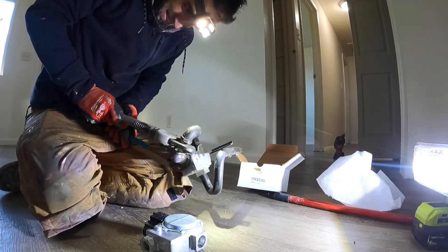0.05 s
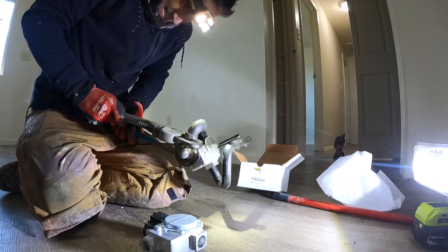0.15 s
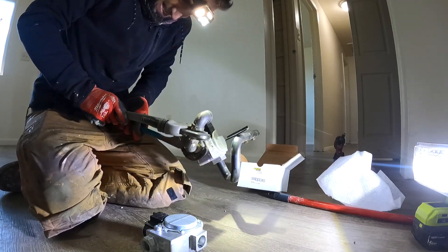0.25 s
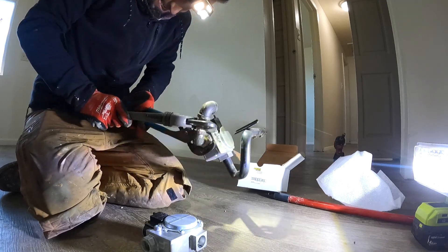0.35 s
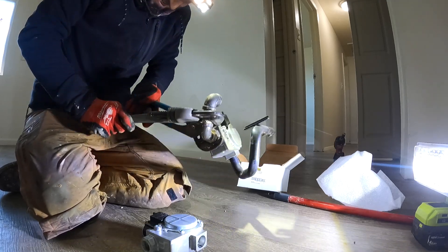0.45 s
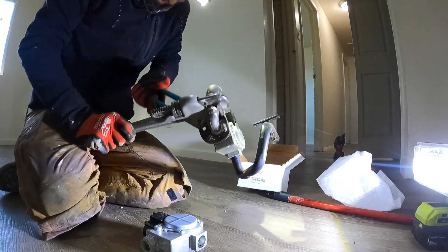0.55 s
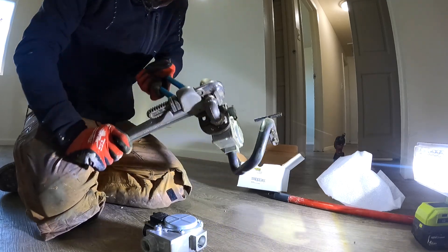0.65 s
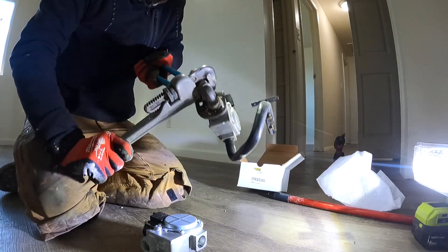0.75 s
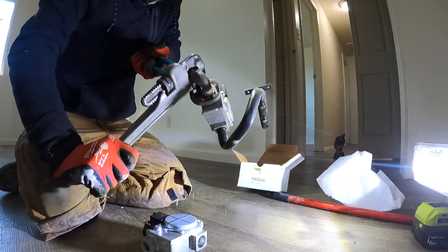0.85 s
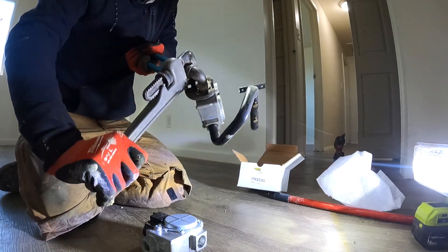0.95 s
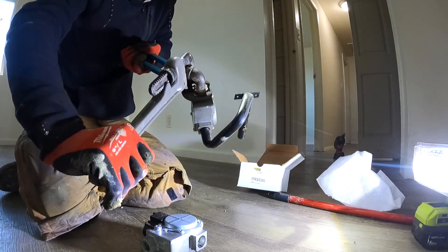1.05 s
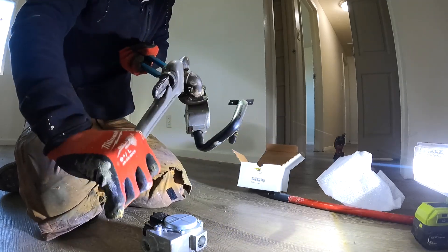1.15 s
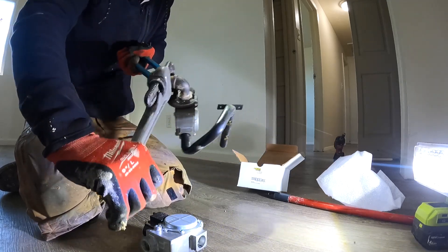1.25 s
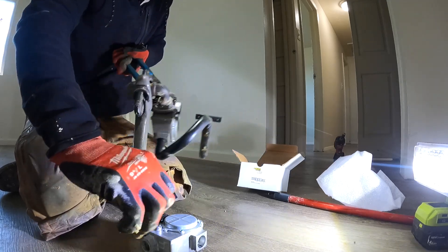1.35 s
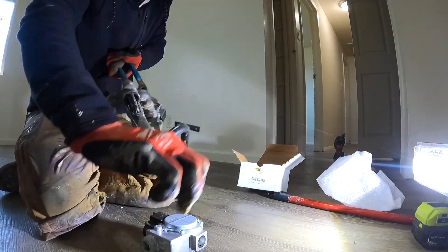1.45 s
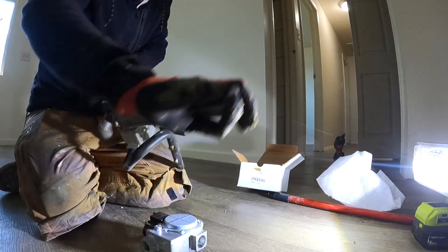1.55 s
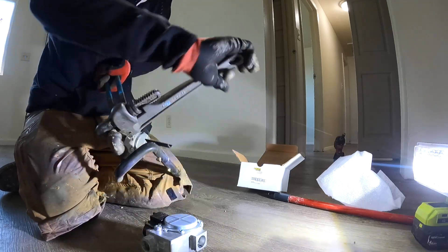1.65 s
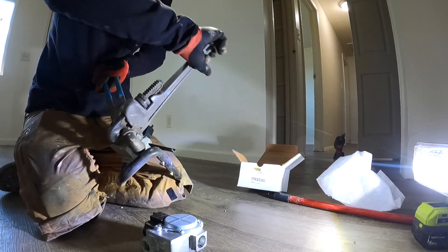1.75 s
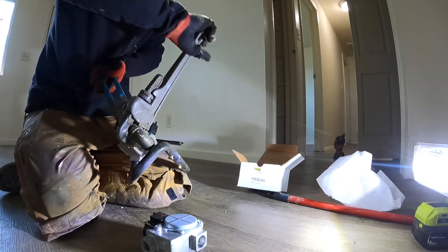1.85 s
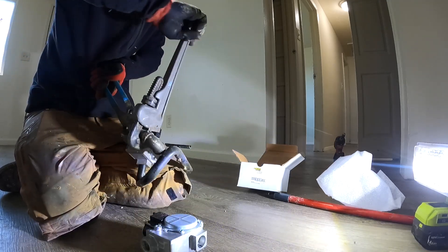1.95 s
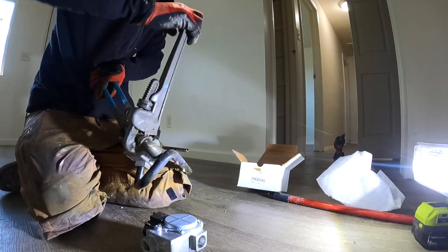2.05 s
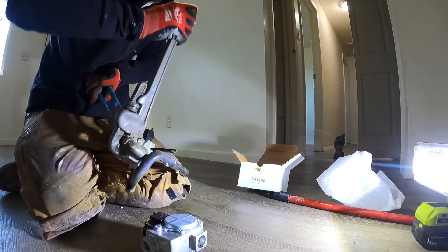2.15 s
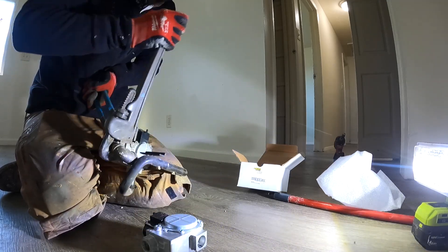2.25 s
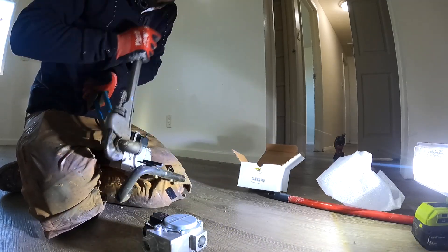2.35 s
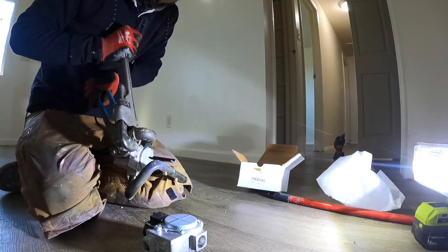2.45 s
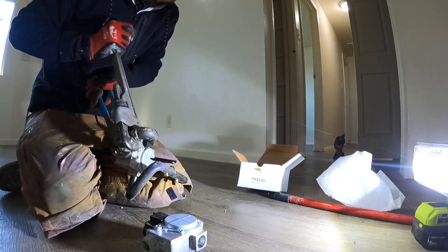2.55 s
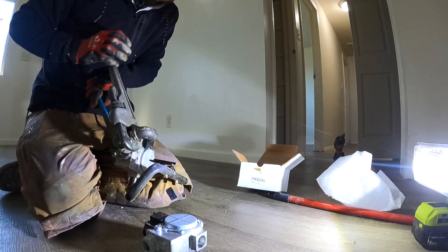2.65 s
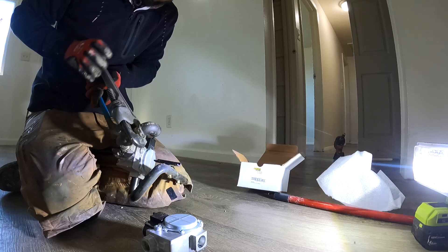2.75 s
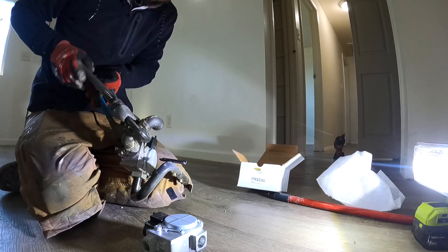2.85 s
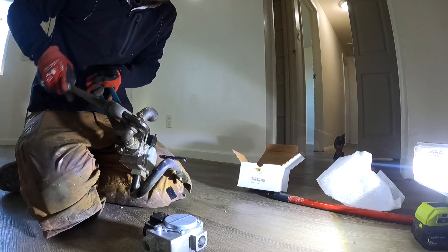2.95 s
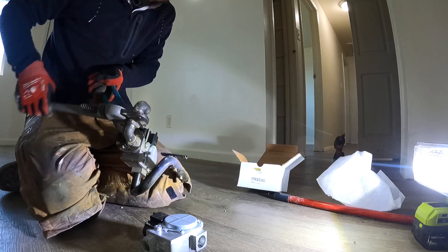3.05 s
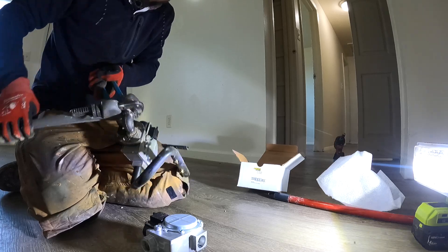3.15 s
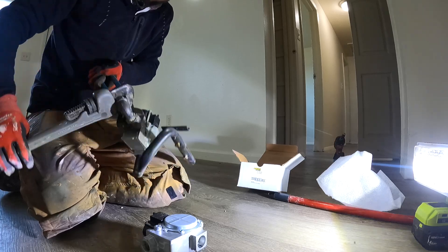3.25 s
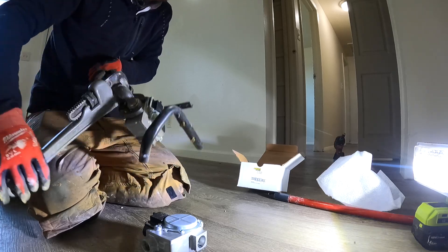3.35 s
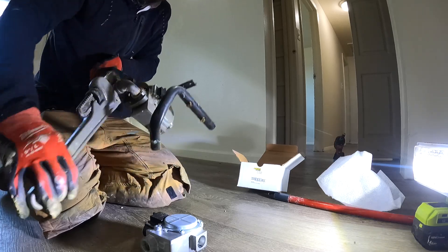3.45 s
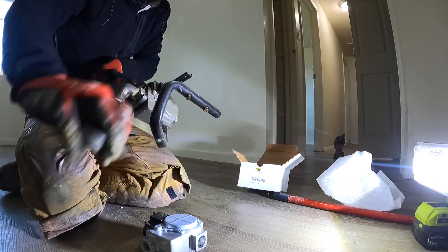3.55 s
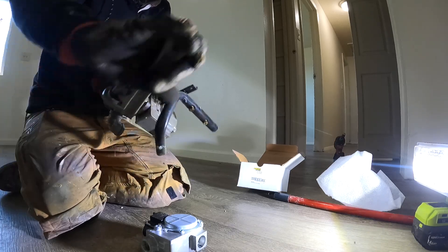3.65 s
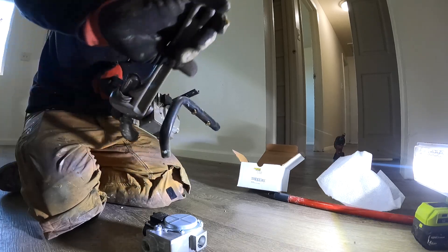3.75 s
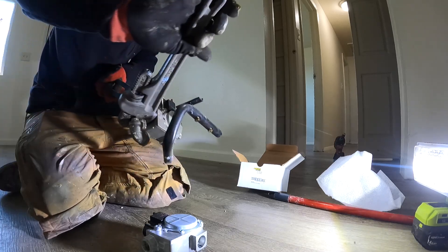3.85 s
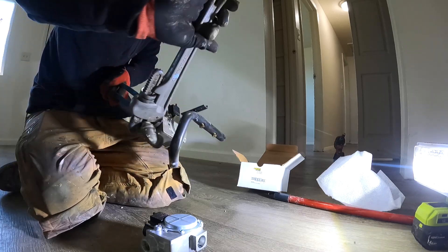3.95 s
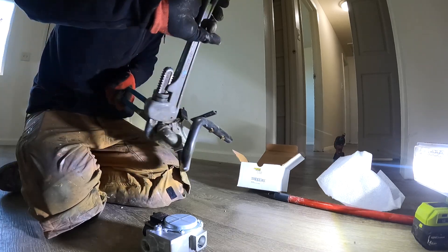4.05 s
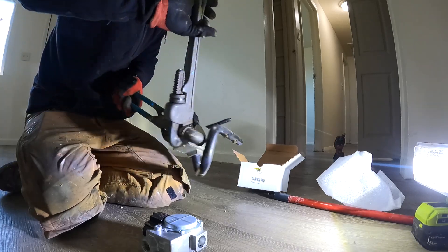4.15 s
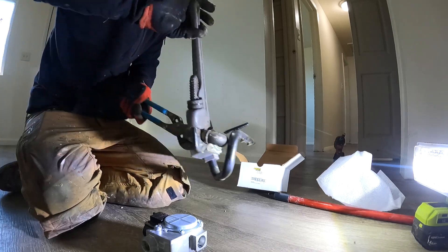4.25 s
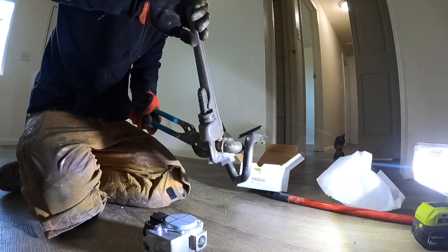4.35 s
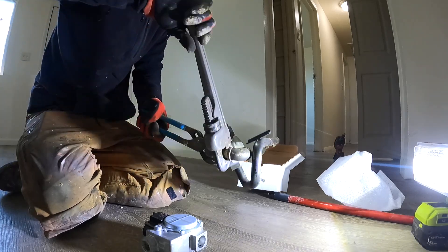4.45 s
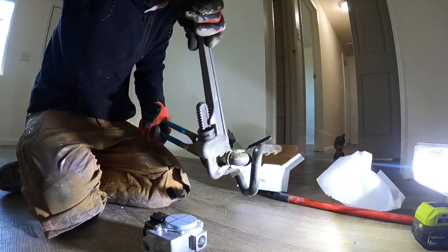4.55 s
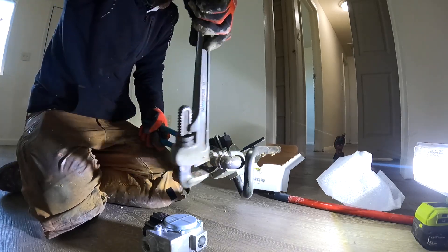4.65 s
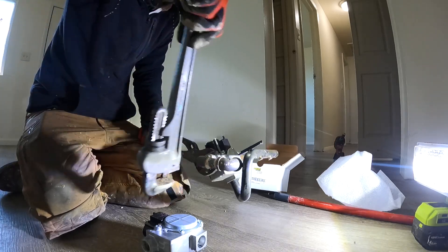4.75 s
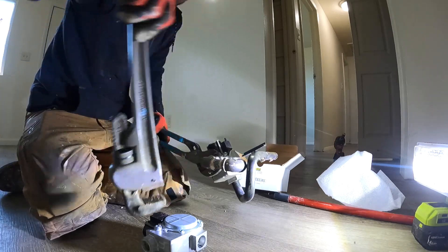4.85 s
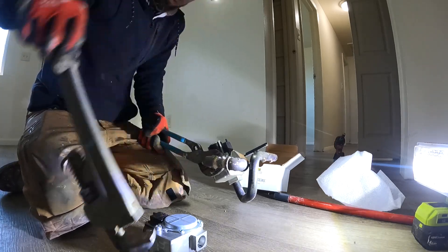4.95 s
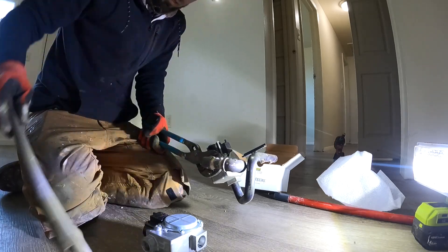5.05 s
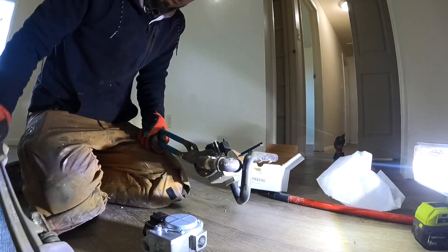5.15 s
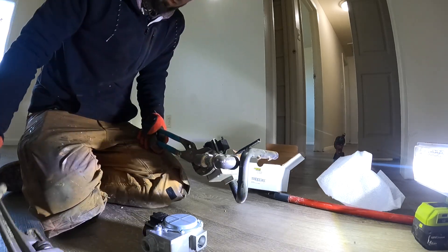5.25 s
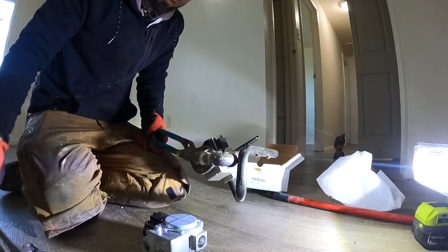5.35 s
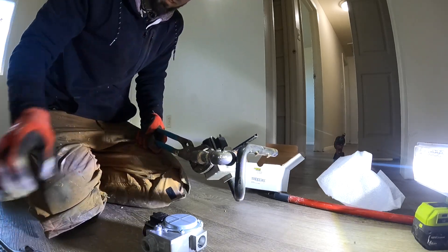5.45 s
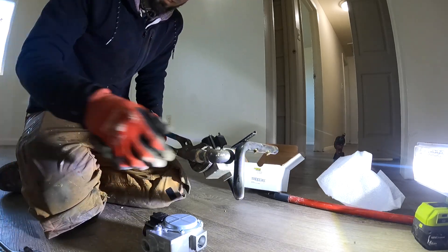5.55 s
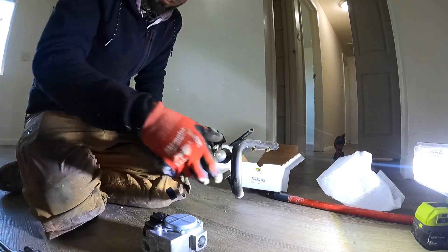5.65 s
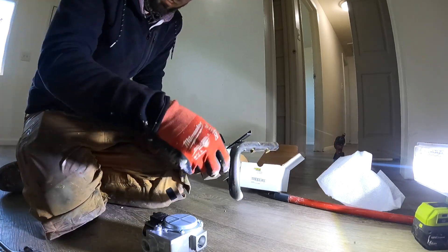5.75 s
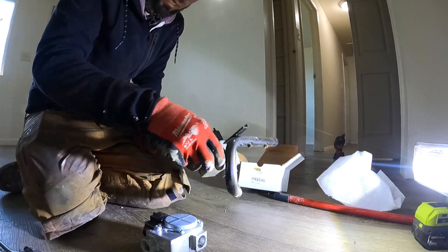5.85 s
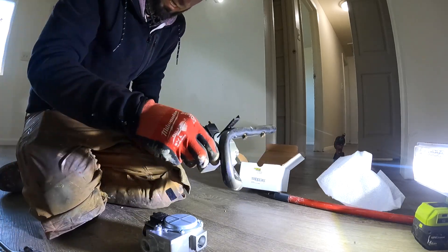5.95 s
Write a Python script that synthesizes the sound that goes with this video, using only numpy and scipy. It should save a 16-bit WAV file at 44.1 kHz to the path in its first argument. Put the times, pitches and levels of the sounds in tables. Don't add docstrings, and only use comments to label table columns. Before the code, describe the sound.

Close stereo microphone in an empty, reverberant room. Cloth rubs in short strokes between isolated damped steel knocks as a wrench works on fittings. A quick burst of sharper clacks follows, then a lull with a few small ticks. Finally the heavy tool lands on boards, by far the loudest event, tips over, chatters and scrapes, leaving ringing steel, room echo and faint hum.

```python
import sys
import numpy as np
from scipy import signal
from scipy.fft import rfft, irfft
from scipy.io import wavfile

SR = 44100
rng = np.random.default_rng(int(sys.argv[2]) if len(sys.argv) > 2 else 0)


def voltage_ratio(level):
    return 10 ** (np.asarray(level, float) / 20)


def wrap_up_sound(samples):
    columns = np.atleast_2d(samples).T
    tamed = np.clip(columns, -1, 1)
    steps = np.round(tamed * 32767).astype(np.int16)
    wavfile.write(sys.argv[1], SR, steps)


N = 265041


def rms_one(x):
    return x / np.sqrt(np.mean(x ** 2) + 1e-20)


def at_hz(points, hz, order=1):
    return np.interp(np.log(hz), np.log(np.array(points)[:, 0]), np.array(points)[:, order])


def drift(rate):
    r = np.exp(-80 * np.pi * rate / SR)
    slow = signal.lfilter([1], [1, -2 * r, r * r], rng.standard_normal(N // 40 + 2002))[2000:]
    return np.interp(np.arange(N) / 40, np.arange(len(slow)), rms_one(slow))


def ring(clicks, hz, t60):
    r, w = voltage_ratio(-60 / (t60 * SR)), 2 * np.pi * hz / SR
    return signal.lfilter([0, np.sin(w)], [1, -2 * r * np.cos(w), r * r], clicks + 1e-18)


def resonance(x, hz, width_hz):
    r = np.exp(-np.pi * width_hz / SR)
    feedback = [1, -2 * r * np.cos(2 * np.pi * hz / SR), r * r]
    return signal.lfilter([(1 - r * r) / 2, 0, (r * r - 1) / 2], feedback, x)


def bands(size):
    edges_hz = 22 * 2 ** np.arange(0, 9.7, .5)
    white = rng.standard_normal((2, 2, size))
    for k, (low, high) in enumerate(zip(edges_hz, edges_hz[1:])):
        band = signal.butter(2, [low, high], "band", fs=SR, output="sos")
        mid, side = signal.sosfilt(band, white[k % 2])
        yield np.sqrt(low * high), mid, side


def knock(hz, cycles, chatter_s, draws, spread_db):
    t = np.arange(len(draws)) / SR
    contact = draws ** 3 * voltage_ratio(-60 * t / chatter_s) * 0.078
    contact[0] = 1
    octaves = np.array([-1.6, -1.15, -.75, -.4, 0, .3, .55, .85]) * (1 + .08 * draws[-8:])
    t60 = cycles / hz * (chatter_s / 0.018) ** .5
    body = 0
    for k, octave in enumerate(octaves):
        mode_gain = voltage_ratio(-spread_db * abs(octave)) * (-1) ** k
        body = body + mode_gain * ring(contact, hz * 2 ** octave, t60 / 2 ** octave * 2 ** octave)
    return body / np.max(np.abs(body))


def jaws():
    # start in seconds, knock level in dB, knock pitch in Hz, jaw click level in dB.
    turning = [(0.488, -41, 2600, -50), (1.016, -16, 1530, -45), (1.018, -28.5, 870, -55),
               (1.022, -17.5, 1734, -32), (1.313, -30.5, 1770, -48), (1.364, -36, 1840, -70),
               (1.605, -44, 1740, -57), (1.796, -22.5, 1950, -34), (1.8, -32, 1030, -34),
               (1.813, -45, 1000, -39), (1.843, -29.5, 1100, -26.5), (1.926, -32, 1710, -63),
               (2.174, -42, 1190, -44.5), (2.357, -29, 2740, -56), (2.448, -26, 3200, -51),
               (2.73, -40.5, 1410, -50), (2.988, -42, 1240, -44), (3.251, -46, 2130, -40),
               (3.33, -38, 3170, -36.5), (3.351, -33, 3480, -36)]
    refitting = [(3.371, -21.5, 2820, -46), (3.377, -21, 1610, -45), (3.378, -40, 850, -41),
                 (3.448, -14.5, 2154, -27.5), (3.6, -15, 2720, -22), (3.61, -9.5, 2210, -26),
                 (3.669, -5.5, 2980, -15), (3.677, -11.5, 2990, -19.5), (3.707, -14.5, 2800, -44),
                 (3.74, -17, 2070, -23), (3.757, -21.5, 1360, -25), (3.771, -22, 2900, -49),
                 (3.917, -28, 2940, -45), (3.984, -31.5, 1490, -59), (3.995, -31, 2280, -42),
                 (4.705, -26.5, 2480, -44), (4.732, -30, 2480, -60), (4.88, -39, 1020, -47),
                 (4.916, -16.5, 2490, -31), (4.917, -28.5, 940, -35), (4.926, -37, 2270, -40),
                 (5.043, -33, 2280, -53), (5.13, -43, 1060, -75)]
    laying_down = [(5.253, -25.5, 890, -50), (5.2655, -5, 1110, -15), (5.273, 0, 1640, -0.5),
                   (5.479, -12, 985, -25), (5.491, -37, 910, -15.5), (5.512, -27, 1000, -20),
                   (5.526, -5.5, 3420, -17), (5.537, -10, 1050, -29), (5.549, -10, 1060, -24),
                   (5.5687, -12, 1490, -35), (5.576, -48, 1010, -11), (5.59, -15, 2540, -38),
                   (5.622, -13.5, 992, -16), (5.636, -22, 950, -18), (5.661, -15.5, 1170, -20),
                   (5.724, -26, 950, -40), (5.77, -18, 2260, -55)]
    out = np.zeros(N)
    for rows, chatter_s in (turning, 0.024), (refitting, 0.033), (laying_down, 0.027):
        for s, dull_db, dull_hz, click_db in rows:
            at, draws = round(s * SR), rng.standard_normal((2, 3000))
            click_hz = 4504 * (1 + .03 * draws[0, -9])
            out[at:at + 3000] += voltage_ratio(dull_db) * knock(dull_hz, 12.3, chatter_s, draws[0], spread_db=10.0)
            out[at:at + 3000] += voltage_ratio(click_db + 6.0) * knock(click_hz, 23.0, chatter_s, draws[1], spread_db=19.0)
    return out


def loose_parts():
    # start in seconds, level in dB, pitch in Hz, chatter in ms.
    ticks = [(1.018, -34, 2900, 30), (1.029, -32, 3270, 110), (1.015, -34.5, 6000, 36),
             (1.365, -46, 2850, 68), (1.253, -51.5, 9400, 5.5), (1.801, -37, 1000, 49),
             (1.843, -23, 5100, 4.1), (3.449, -26, 3780, 18), (3.061, -36.5, 5200, 4.4),
             (3.376, -30.5, 6000, 26), (3.611, -17, 2300, 43), (3.917, -43, 10300, 4.5),
             (4.39, -34.5, 10000, 27), (4.391, -32.5, 7000, 31), (4.392, -31, 4700, 21),
             (4.656, -50, 7000, 50), (4.706, -29.5, 2110, 81), (4.734, -30.5, 1937, 73),
             (4.734, -49, 840, 130), (4.917, -29.5, 5520, 20), (5.044, -54, 2970, 6),
             (5.275, -12, 3550, 30), (5.274, -15, 5600, 51), (5.274, -14.5, 10400, 20),
             (5.492, -11.5, 5300, 6.3), (5.519, -22, 5570, 35), (5.533, -16.5, 3700, 36),
             (5.266, -9, 1020, 38), (5.569, -7.5, 6970, 14.4), (5.661, -23, 7600, 8)]
    out = np.zeros(N)
    for s, db, hz, chatter_ms in ticks:
        at, draws = round(s * SR), rng.standard_normal(3000)
        out[at:at + 3000] += voltage_ratio(db + 5.0) * knock(hz, 15.0, max(chatter_ms, 1) / 1000, draws, spread_db=21.5)
    return out


def cracks():
    # start in seconds, level in dB, length of each half (push, pull) in ms.
    pulses = [
        (1.0225, -22, 0.35),
        (4.9165, -21.5, .2),
        (5.2655, -2.5, 0.29),
        (5.549, -11, 0.43),
        (5.5688, 0, .3),
    ]
    t = np.arange(N) / SR
    out = 0
    for s, db, ms in pulses:
        turn = np.clip((t - s) * 1000 / ms / 2, 0, 1)
        out = out - voltage_ratio(db) * np.sin(2 * np.pi * turn)
    return out


def handle(chatter):
    modes_hz = [817, 968, 1254, 2272, 2575, 2736, 2920, 4336, 4352, 4366, 4715, 5507, 5540, 6176, 6225,
                11900, 13600, 8287, 10720]
    families = [1, 1, 1, 1, 1, 1, 1, 2, 2, 2, 2, 3, 3, 4, 4, 4, 4, 5, 5]
    # level in dB, t60 in seconds.
    decays = [(-15, 0.27), (3.5, 0.075), (-7, 0.24), (-13, 1), (-6, 0.24), (-5, 0.78), (-12, 0.45),
              (1, 0.32), (-2.5, 0.53), (-5, 0.39), (-5.5, 0.78), (-1.5, 0.82), (2, 0.22), (0, 0.48),
              (-6, 0.23), (-22, .15), (-22, .2), (-9.5, 0.17), (-13, 0.066)]
    # start in seconds, level in dB, place along the handle [0-1],
    # extra dB per higher family, level of the lowest family in dB.
    pings = [(3.601, -32, .3, -2.5, -60), (3.669, -26, .35, 2.5, -37.5), (3.74, -43, 0.4, 6, -39),
             (4.916, -56, .3, 7, -58), (5.043, -70, 0.26, 11.5, -66), (5.273, -23.5, .22, -1.5, -31),
             (5.491, -24, 0.52, 4, -22), (5.556, -42.5, 0.38, 14, -35), (5.578, -31.5, 0.33, -9, -36),
             (5.593, -22, 0.29, 2, -39), (5.622, -23.5, 0.32, 0.5, -28), (5.661, -35, 0.27, -5.5, -45)]
    node_leak = 0.037
    out = np.zeros(N)
    s, blow_db, place, tilt_db, low_db = np.transpose(pings)
    at = np.round(s * SR).astype(int)
    for hz, family, (db, t60) in zip(modes_hz, families, decays):
        strikes = chatter * voltage_ratio(db - 12.0 * abs(family - 2))
        if family == 1:
            blows = voltage_ratio(low_db)
        else:
            blows = voltage_ratio(blow_db + tilt_db * (family - 3)) * (np.sin(np.pi * family * place) ** 2 + node_leak)
        strikes[at] += voltage_ratio(db) * blows
        out += ring(strikes, hz, t60)
    return out


def slide():
    # time in seconds, level in dB.
    effort_curve = [
        (5.47, -60),
        (5.49, -25.5),
        (5.545, -34),
        (5.57, -36),
        (5.61, -24.5),
        (5.68, -35),
        (5.74, -33.5),
        (5.8, -37.5),
        (6.0, -47.5),
    ]
    # centre in Hz, width in Hz, level in dB.
    scraped = [(880, 430, 6), (1280, 620, 7.5), (2310, 440, 9), (3830, 3000, 2.5), (5030, 2400, 0.5)]
    heights = voltage_ratio(0.88 * np.minimum(rng.exponential(1, N), 4)) * rng.choice([-1, 1], N)
    clicks = (rng.random(N) < 1500 / SR) * heights
    wood = 0
    for k, (hz, width_hz, db) in enumerate(scraped):
        wood = wood + voltage_ratio(db) * resonance(clicks, hz, width_hz) * (-1) ** k
    wood = signal.sosfilt(signal.butter(2, 6500, fs=SR, output="sos"), wood)
    s, effort_db = np.transpose(effort_curve)
    effort = voltage_ratio(np.interp(np.arange(N) / SR, s, effort_db, -99, -99))
    return effort * rms_one(clicks), effort * rms_one(wood)


def floor():
    # start in seconds, level in dB.
    booms = [
        (5.277, -11.5),
        (5.489, -31),
        (5.531, -29.5),
        (5.571, -23.5),
        (5.66, -38),
    ]
    # pitch in Hz, level in dB, t60 in seconds.
    boards = [(117.4, 7, 0.41), (119.7, -6.5, 0.48), (154.4, 5, 0.14), (191, -8, 0.16), (289, -5.5, 0.23)]
    push = np.zeros(N)
    push[[round(s * SR) for s, db in booms]] = voltage_ratio([db for s, db in booms])
    push = np.convolve(push, np.hanning(130) / 65)[:N]
    push = signal.sosfilt(signal.butter(2, 75, "high", fs=SR, output="sos"), push)
    return sum(voltage_ratio(db) * ring(push, hz, t60) for hz, db, t60 in boards)


def scatter(x, level_db):
    echoes = np.diff(rng.standard_normal(200)) * voltage_ratio(-40 * np.arange(199) / 199)
    return voltage_ratio(level_db) * signal.fftconvolve(x, echoes)[:N] * [[1], [-1]]


def room(x, first_s):
    # frequency in Hz, t60 in seconds, level in dB.
    reverb = [(175, 0.22, 19), (392, 0.72, 7), (1000, 0.82, -0.5), (2850, 1, -5), (6000, 0.86, -5.5),
              (11300, 0.46, -3)]
    t = np.arange(SR) / SR
    echoes = 0
    for hz, mid, side in bands(SR):
        dying = voltage_ratio(at_hz(reverb, hz, order=2) - 60 * t / at_hz(reverb, hz))
        spread = np.clip(0.5 + 0.011 * np.log2(hz / 1000), 0, 1)
        echoes = echoes + dying * (mid + spread * side * [[1], [-1]])
    echoes *= np.clip(t / first_s - 1, 0, 1) / np.sqrt(SR)
    return signal.fftconvolve(x[None], echoes)[:, :N]


def strokes_db(rows):
    attack_s, release_db_per_s = 0.019, 253
    start, length, level_db = np.array(rows).T[:3, :, None]
    t = np.arange(0, N, 40) / SR
    rise = 20 * (start - t) / attack_s
    fall = release_db_per_s * (t - start - length)
    return level_db - np.maximum(np.maximum(rise, fall), 0)


def movement():
    # start in seconds, length in seconds, level in dB,
    # brightness in dB per octave.
    strokes = [(-0.1, 0.4, -44.5, 0.5), (0.487, 0.017, -49.5, -0.5), (0.757, 0.036, -41, 1.5),
               (0.804, 0.14, -35.5, 2), (1.42, 0.33, -55.5, 0.5), (1.714, 0.1, -46, 0),
               (1.932, 0.079, -43, .5), (2.045, 0.1, -49.5, -2.5), (2.172, 0.1, -42.5, 1),
               (2.268, 0.063, -39, 0), (2.37, .1, -42.5, -3.5), (2.499, 0.04, -36, -0.5),
               (2.563, 0.094, -43, -1.5), (2.711, 0.15, -47.5, -1), (2.902, 0.26, -47, -0.5),
               (3.214, 0.18, -43, 1), (3.568, 0.051, -38, -8), (4.244, 0.13, -55.5, 1),
               (4.473, 0.021, -45.5, 1), (4.665, 0.055, -49, -1), (4.777, 0.058, -49.5, -1.5),
               (4.874, 0.0076, -50, -4)]
    # start in seconds, length in seconds, low rub level in dB.
    bumps = [(0.0, 0.039, -52.5), (0.15, 0.16, -51.5), (0.835, 0.021, -46.5), (1.885, 0.013, -48),
             (2.45, 0.0074, -44), (2.545, 0.028, -41.5), (2.98, 0.044, -52.5), (3.38, 0.194, -48),
             (4.88, 0.014, -69), (1.05, 0.052, -64), (5.15, .03, -69)]
    still_db = -57
    power = voltage_ratio(2 * strokes_db(strokes))
    total = power.sum(axis=0) + voltage_ratio(2 * still_db)
    level_db = 10 * np.log10(total)
    bright = np.array(strokes)[:, -1] @ power / total
    rub_db = level_db - 13.5 - 4.8 * np.maximum(bright, 0)
    rub_db = np.maximum(rub_db, strokes_db(bumps).max(axis=0))
    return [np.interp(np.arange(N) / 40, np.arange(len(c)), c) for c in (level_db, bright, rub_db)]


def cloth_and_hush():
    # frequency in Hz, level in dB per Hz.
    cloth_colour = [(410, -41), (700, -11), (1180, -8), (1850, -6.5), (2730, -6.5), (3360, -6), (6100, -7),
                    (12100, -29), (14000, -27.5), (15500, -48)]
    # frequency in Hz, level in dB.
    hush_colour = [(25, -33), (50, -43.5), (100, -37), (200, -47.5), (350, -46), (700, -77.5), (1300, -51),
                   (2000, -56.5), (4000, -68), (8000, -77), (13000, -119)]
    # frequency in Hz, correlation [0-1].
    likeness = [(60, .95), (240, 0.8), (950, 0.75), (3770, 0.85), (15000, .65)]
    level_db, bright, rub_db = movement()
    bright = np.clip(bright, -4, 5)
    out, crumple = 0, drift(40.0)
    for hz, mid, side in bands(N):
        alike = np.clip(at_hz(likeness, hz), 0, 1)
        hush = voltage_ratio(at_hz(hush_colour, hz) + 2.0 * drift(20.0))
        if hz < 900:
            cloth_db = rub_db + 11.0 - 5.2 * np.log2(hz / 330) ** 2
        else:
            cloth_db = level_db + 4.0 + at_hz(cloth_colour, hz) + bright * np.log2(hz / 3500)
        cloth = voltage_ratio(cloth_db + 0.24 * crumple + 1.77 * drift(23.6))
        stereo = np.sqrt(1 + alike) * mid + np.sqrt(1 - alike) * side * [[1], [-1]]
        out = out + np.hypot(hush, cloth) * stereo
    return out


def hum():
    # pitch in Hz, width in Hz, level in dB.
    drone = (160.6, 35.6, -48.5)
    hz, width_hz, level_db = drone
    noise = rng.standard_normal((2, N))
    mid, side = resonance(resonance(noise, hz, width_hz), hz, width_hz)
    return voltage_ratio(level_db + 2 * drift(1.9)) * (mid + 0.1 * side * [[1], [-1]]) * 10


def scene():
    chatter, scraping = slide()
    tools = jaws() + loose_parts() + cracks() + handle(voltage_ratio(-36.5) * chatter) + scraping
    near = tools + scatter(tools, level_db=-24.5)
    echoes = voltage_ratio(11.0) * room(tools, first_s=0.0014)
    boom = floor() * voltage_ratio([[-1.5], [1.5]])
    return near + echoes + boom + cloth_and_hush() + hum()


def top_cut(x):
    return signal.sosfilt(signal.butter(12, 14000, fs=SR, output="sos"), x)


def record(dry):
    # frequency in Hz, left minus right in dB.
    lean = [(25, -35), (60, 30.5), (116, -0.5), (180, -1), (550, -0.5), (1650, 3), (4970, -0.5),
            (15000, 4.5)]
    lean_db = at_hz(lean, np.maximum(np.fft.rfftfreq(N, 1 / SR), 1)) * [[.5], [-.5]]
    x = irfft(rfft(dry) * voltage_ratio(lean_db), N)
    x = signal.sosfilt(signal.butter(4, 13500, fs=SR, output="sos"), x)
    over_db = np.maximum(20 * np.log10(np.abs(x).max(axis=0) + 1e-9) + 7.56, 0) * 0.78
    release_db = 60.0 * np.arange(N) / SR
    duck_db = np.maximum.accumulate(over_db + release_db) - release_db
    duck_db = signal.lfilter([.02], [1, -.98], duck_db)
    mix = 1.018 * np.tanh(x * voltage_ratio(-duck_db) / 1.162)
    return top_cut(mix)


dry = scene()
out = record(dry)
wrap_up_sound(out)
```